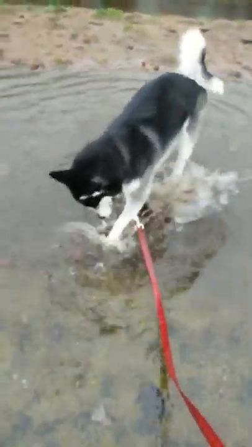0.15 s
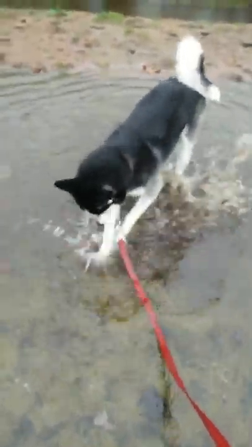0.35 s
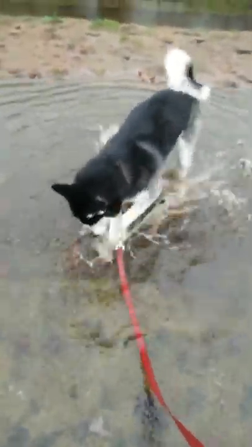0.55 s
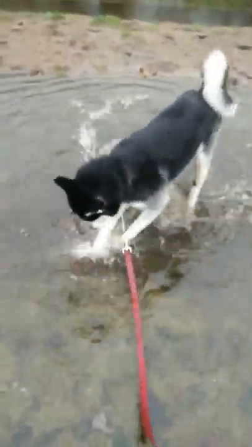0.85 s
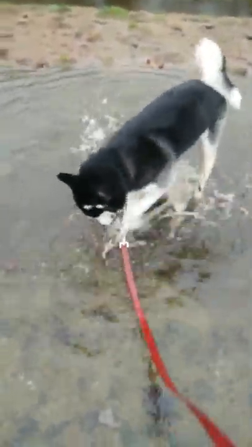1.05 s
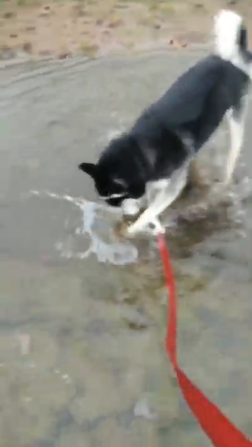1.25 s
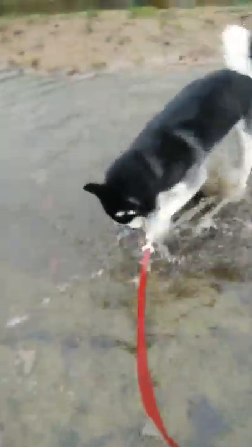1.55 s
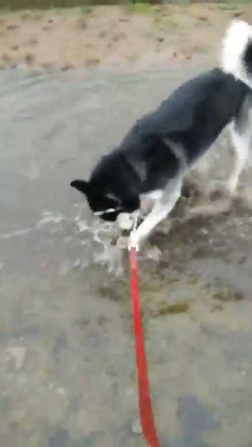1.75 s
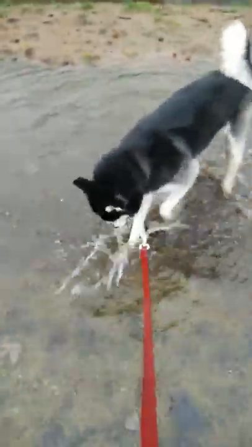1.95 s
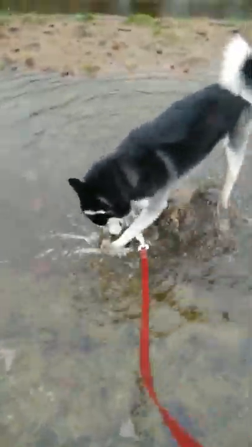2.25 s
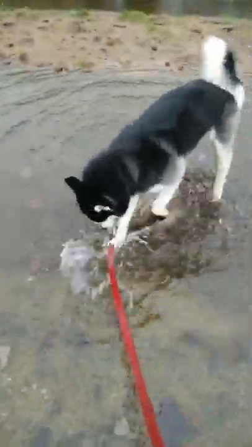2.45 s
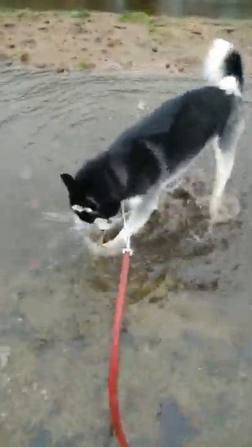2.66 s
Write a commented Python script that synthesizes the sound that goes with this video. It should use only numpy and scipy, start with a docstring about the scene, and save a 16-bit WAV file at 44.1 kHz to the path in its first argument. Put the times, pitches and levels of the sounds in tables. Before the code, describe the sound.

Rapid splashing runs throughout as a dog slaps its paws in a puddle a couple of metres away, scattering drops and bubbles. Outdoor wind grows into rumbling, popping gusts on the microphone, strongest on the left.

```python
"""A dog paws a shallow puddle outdoors, a couple of metres from two microphone ports.
From the start, each slap gives a click and a burst of drop impacts over falling spray, and trapped
air rings as bubbles; the ports resonate near 7 kHz and brighten the splashes. From about 0.8 s the
gusty wind grows, its eddies buffeting each port on its own, hardest the left. After 1.5 s they snap
most sharply, while the pawing goes on to the end over a faint steady hiss."""
import sys
import numpy as np
from scipy import signal
from scipy.io import wavfile
from scipy.ndimage import uniform_filter1d

SR = 44100
rng = np.random.default_rng(int(sys.argv[2]) if len(sys.argv) > 2 else 0)


def wav_out(sig):
    """Save sig, one row per channel (or a flat mono array), as 16-bit PCM at SR to the path in sys.argv[1]."""
    wavfile.write(sys.argv[1], SR, np.round(np.clip(np.atleast_2d(sig).T, -1, 1) * 32767).astype(np.int16))


N = 123479

# Falling spray: time_s, level_db, left_minus_right_db
FALLING_SPRAY = [(0.0, -32.5, 2), (0.09, -37, -1), (0.1, -29, -5), (0.2, -35, 1), (0.36, -30, 2),
                 (0.56, -35, 1.0), (0.62, -31, -0.5), (0.82, -34, 0), (0.85, -31, 2), (1.1, -33.5, -1.5),
                 (1.12, -32, 3), (1.27, -38.5, -2.5), (1.35, -33.5, -3.5), (1.58, -37.5, -5),
                 (1.61, -32.5, -17), (1.65, -37, 0), (1.68, -32.5, -14), (1.71, -35.5, -3.5),
                 (1.83, -35.5, -1), (1.85, -29, -1), (2.06, -39.5, -2), (2.1, -32.5, -1), (2.27, -39, -2.5),
                 (2.38, -35.5, 1), (2.6, -43, -5), (2.65, -31.5, 1), (2.66, -40.5, -4.0), (2.7, -29.5, 4),
                 (2.75, -38.5, -5), (2.8, -35, 2)]
# Paw slaps on the water: start_s, peak_db, left_minus_right_db, t60_s, rise_s
PAW_SLAPS = [(0.102, -17, 3, 0.023, 0.0043), (0.1234, -26, 4, 0.042, 0.0027),
             (0.147, -21, 2, 0.047, 0.0023), (0.2733, -19, 1, 0.016, 0.0024),
             (0.2937, -37, 0, 0.05, 0.0026), (0.3446, -17, -1, 0.041, 0.003), (0.36, -27, 7, 0.04, 0.003),
             (0.395, -16, 3, 0.074, 0.0035), (0.4464, -22.5, -6, 0.059, 0.0023),
             (0.4657, -24, 12, 0.037, 0.002), (0.607, -21, -1, 0.05, 0.0022), (0.63, -17, 2, 0.028, 0.0017),
             (0.721, -20.5, 3, 0.029, 0.0018), (0.7697, -27, 3.0, 0.067, 0.0058),
             (0.844, -25, -11, 0.05, 0.0028), (0.853, -17.5, 1, 0.05, 0.0024),
             (0.8813, -18, -4, 0.061, 0.0026), (0.9148, -20, -3, 0.049, 0.0021),
             (0.989, -25, 2, 0.043, 0.0026), (1.07, -23, -6, 0.047, 0.0032),
             (1.122, -23, -10, 0.039, 0.0027), (1.1363, -13, -3, 0.02, 0.0024),
             (1.186, -21, -6, 0.074, 0.0027), (1.3628, -22, -3, 0.039, 0.0033),
             (1.4058, -20.5, -1, 0.1, 0.0041), (1.459, -24, -1, 0.2, 0.003),
             (1.543, -21.5, -6, 0.02, 0.0048), (1.586, -22, 4, 0.044, 0.003),
             (1.596, -27, -11, 0.059, 0.0037), (1.606, -22, 15, 0.043, 0.0016),
             (1.676, -14.5, 0, 0.031, 0.0033), (1.8582, -14.5, 0, 0.016, 0.0026),
             (1.91, -21, -3, 0.085, 0.0041), (2.023, -27, 1, 0.054, 0.002), (2.0832, -38, -4, 0.045, 0.003),
             (2.104, -24, -2, 0.056, 0.0032), (2.114, -19, 1, 0.078, 0.0037),
             (2.178, -24, -3.0, 0.14, 0.0034), (2.301, -20, -1, 0.071, 0.0024),
             (2.3515, -26, -11, 0.05, 0.0032), (2.365, -20, -4, 0.13, 0.0023),
             (2.4264, -18.5, -5, 0.063, 0.0042), (2.473, -25, -4, 0.025, 0.0015),
             (2.531, -20, -6, 0.039, 0.001), (2.549, -25.5, -2, 0.09, 0.002),
             (2.629, -24.5, 7, 0.027, 0.0025), (2.642, -20, -4, 0.067, 0.003),
             (2.65, -14.5, -5, 0.015, 0.0017), (2.67, -24, -4.0, 0.037, 0.0027),
             (2.6973, -16, -9.5, 0.033, 0.0014), (2.711, -27, -6, 0.05, 0.0023),
             (2.7894, -26.5, -10, 0.042, 0.0026)]


def from_db(db):
    return 10 ** (np.asarray(db) / 20)


def unit_rms(x):
    return x / np.sqrt(np.mean(x ** 2, axis=-1, keepdims=True) + 1e-20)


def pan_gains(pan_db):
    return from_db(np.array([pan_db / 2, -pan_db / 2]))


def in_time(rows):
    """Linear interpolation of each column to one value a sample."""
    times_s, *columns = np.transpose(rows)
    return [np.interp(np.arange(N) / SR, times_s, column) for column in columns]


def level_at(spectrum, hz):
    """Interpolation of a spectrum's level over log frequency."""
    points_hz, levels_db = np.transpose(spectrum)
    return np.interp(np.log(hz), np.log(points_hz), levels_db)


def butterworth(x, edges_hz, kind, order=2):
    return signal.sosfilt(signal.butter(order, edges_hz, kind, fs=SR, output="sos"), x)


def drift(corner_hz):
    """Low-passed noise: a slow random fluctuation of unit rms."""
    step = 20
    pole = np.exp(-2 * np.pi * corner_hz * step / SR)
    slow = signal.lfilter([1], [1, -2 * pole, pole ** 2], rng.standard_normal(N // step + 1002))[1000:]
    return np.interp(np.arange(N) / step, np.arange(len(slow)), unit_rms(slow))


def resonate(x, hz, width_hz):
    """A damped two-pole resonator with unit gain at its peak."""
    radius = np.exp(-np.pi * width_hz / SR)
    gain = (1 - radius ** 2) / 2
    feedback = [1, -2 * radius * np.cos(2 * np.pi * hz / SR), radius ** 2]
    return signal.lfilter([gain, 0, -gain], feedback, x + 1e-18)


def port_resonance(x):
    """Resonance of a microphone port lifts a band of the treble."""
    return x + from_db(18) * resonate(x, hz=7390, width_hz=1050)


def to_stereo(x):
    """Interchannel delay: the left channel is slightly later; the lag shrinks from 1.0 to 1.3 s."""
    # Delay of the left channel: time_s, lag_s
    left_lag = [(0, .0003), (1.0, .0003), (1.3, .00003), (2.8, .00003)]
    lag_samples = np.round(in_time(left_lag)[0] * SR).astype(int)
    return np.array([x[np.maximum(np.arange(N) - lag_samples, 0)], x])


def hiss():
    """High-passed white noise: a faint steady hiss, independent in each channel."""
    return from_db(-52) * butterworth(rng.standard_normal((2, N)), 9500, "high")


def turbulence(spectrum, lump_db, eddy_hz, evening, span_s):
    """Passing eddies modulate eight noise bands, partly together and partly each alone."""
    edges_hz = np.geomspace(spectrum[0][0], spectrum[-1][0], num=9)
    white = rng.standard_normal((2, N))
    common_db = lump_db * drift(eddy_hz)
    pressure = np.zeros(N)
    for k, depth in enumerate(np.linspace(0.52, 1, 8)):  # higher bands swell more deeply
        low, high = edges_hz[k:k + 2]
        band = butterworth(white[k % 2], [low, high], "band")
        swell_db = depth * common_db + 4.5 * drift(eddy_hz)
        pressure += band * from_db(level_at(spectrum, np.sqrt(low * high)) + swell_db)
    pressure = unit_rms(pressure)
    # Dividing by a power of the running level partly evens out the chance swells.
    span = int(span_s * SR)
    running_power = uniform_filter1d(uniform_filter1d(pressure ** 2, span), span) + 1e-9
    return unit_rms(pressure / running_power ** (evening / 2))


def buffeting(gusts):
    """Turbulent pressure on one port: a low rumble and a higher flutter that follow the gusts."""
    # Spectra of the turbulence: frequency_hz, relative_density_db
    rumble_spectrum = [(30, -56), (45, 3.5), (70, -0.5), (110, -1), (170, -4), (260, -11.5), (400, -18)]
    flutter_spectrum = [(150, -7), (250, -2), (400, -3.5), (700, -9.5), (1200, -15), (2000, -32),
                        (3500, -36.5), (5000, -42)]
    rumble = turbulence(rumble_spectrum, lump_db=2.2, eddy_hz=36, evening=0.7, span_s=0.025)
    flutter = turbulence(flutter_spectrum, lump_db=6, eddy_hz=75, evening=0.55, span_s=0.03)
    rumble_db, flutter_db = in_time(gusts)
    return from_db(rumble_db + 2.5) * rumble + from_db(flutter_db - 3.5) * flutter


def eddy_snaps(eddies, trim_db=-4):
    """A single sharp eddy crossing a port makes one short pressure swing."""
    half = 1200
    out, t = np.zeros(N + SR), np.arange(-half, half) / SR
    for (peak_s, db, hz, width_cycles), phase in zip(eddies, rng.random(len(eddies))):
        swing = np.cos(2 * np.pi * (hz * t + phase)) * np.exp(-np.abs(hz * t / width_cycles))
        centre = int(peak_s * SR)
        out[centre - half:centre + half] += from_db(db + trim_db) * swing
    return out[:N]


def wind():
    """Turbulence is local, so each port has gusts and eddies of its own."""
    # Gusts on each port: time_s, rumble_db, flutter_db
    gusts_left = [(0.0, -24, -41), (0.08, -42, -36), (0.115, -14.5, -21), (0.15, -23.5, -40),
                  (0.2, -32, -27), (0.229, -17, -36), (0.269, -28, -61), (0.324, -25, -23.5),
                  (0.369, -37.5, -80), (0.514, -14.5, -47), (0.579, -24.5, -31), (0.634, -20, -25.5),
                  (0.725, -15, -24), (0.76, -15, -37), (0.788, -16.5, -30.5), (0.828, -11, -16.5),
                  (0.968, -17.5, -31), (1.058, -26.5, -41), (1.083, -19, -18.5), (1.117, -14.5, -39),
                  (1.157, -12.5, -18), (1.197, -17.5, -19), (1.232, -30, -52), (1.262, -18.5, -29),
                  (1.287, -8.5, -18), (1.382, -26.5, -38), (1.417, -19, -63), (1.447, -23.5, -26.5),
                  (1.53, -10.5, -17.5), (1.58, -14.5, -27.5), (1.631, -15, -11.5), (1.666, -19, -19.5),
                  (1.721, -18, -8), (1.761, -25, -31), (1.816, -21.5, -25), (1.851, -21, -38),
                  (1.951, -11.5, -11), (2.0, -27.5, -34), (2.03, -20, -26), (2.07, -33, -44),
                  (2.135, -11.5, -24), (2.21, -31, -35), (2.24, -10, -29), (2.29, -11, -1),
                  (2.345, -14, -21), (2.524, -9.5, -10), (2.619, -16, -21), (2.68, -15.5, -21),
                  (2.735, -18, -24), (2.799, -19, -12.5)]
    gusts_right = [(0.0, -30, -44), (0.165, -36, -33.5), (0.2, -33, -38), (0.274, -43, -58),
                   (0.314, -37.5, -54), (0.424, -30.5, -54), (0.469, -43, -45), (0.539, -35.5, -34),
                   (0.773, -43, -37), (0.838, -20, -33), (0.893, -30, -37), (0.973, -45, -37),
                   (1.008, -37, -24), (1.117, -36, -37), (1.162, -12, -14), (1.217, -35, -41),
                   (1.247, -25, -60), (1.332, -56, -67), (1.432, -45, -29.5), (1.507, -58, -30.5),
                   (1.541, -20, -24), (1.626, -32.5, -29.5), (1.771, -13, -31), (1.941, -25.5, -22),
                   (2.015, -18, -27.5), (2.055, -25.5, -26), (2.125, -17, -18.5), (2.18, -34, -16.5),
                   (2.235, -19.5, -10.5), (2.365, -34, -26.5), (2.415, -23, -20), (2.479, -39, -28),
                   (2.599, -21, -19.5), (2.704, -34, -34), (2.744, -22.5, -21.5), (2.799, -32, -18.5)]
    # Single eddies on each port: peak_s, peak_db, pitch_hz, width_cycles
    eddies_left = [(0.116, -4, 310, 0.66), (0.2248, -12.5, 700, 0.38), (0.228, -8.5, 353, 0.97),
                   (0.328, -14, 450, 0.21), (0.428, -11, 400, 0.17), (0.7255, 2, 109, 0.85),
                   (0.947, 0.5, 134, 0.88), (0.821, -0.5, 507, 0.22), (1.0813, -1, 486, 0.2),
                   (1.1543, 0.5, 660, 0.54), (1.1659, -3, 646, 0.44), (1.2693, 0, 360, 0.25),
                   (1.4203, 1.5, 314, 0.35), (1.5658, 2, 460, 0.4), (1.5865, 3.5, 468, 0.35),
                   (1.6377, 10, 440, 0.35), (1.6528, 6, 910, 0.26), (1.7005, 2, 476, 0.4),
                   (1.7126, 4, 630, 0.4), (1.7127, -3, 2810, 0.32), (1.7215, 5, 315, 0.46),
                   (1.9246, 5, 617, 0.38), (1.9513, 1, 384, 0.21), (2.0268, -5, 400, 0.41),
                   (2.1568, -9, 490.0, 0.57), (2.2437, 9, 437, 0.14), (2.28, -6, 1100, 0.24),
                   (2.2924, 6, 483, 0.11), (2.317, 3, 393, 0.43), (2.3979, 6, 760, 0.18),
                   (2.4429, 14, 715, 0.11), (2.509, -8, 1800, 0.36), (2.519, 2, 1510, 0.24),
                   (2.524, 1, 1800, 0.3), (2.5282, 9.5, 610, 0.25), (2.6555, -0.5, 537, 0.4),
                   (2.735, -2, 54.7, 1.2), (2.7437, 4, 540.0, 0.19), (2.7932, -9, 493, 0.23)]
    eddies_right = [(1.0998, -11, 457, 0.45), (1.1616, 1, 455, 0.32), (1.5628, -2.5, 500.0, 0.18),
                    (1.8579, -3, 443, 0.42), (2.01, 0, 360, 0.38), (2.0828, 1.5, 437, 0.35),
                    (2.1185, 2.5, 557, 0.18), (2.1896, 3, 1020, 0.23), (2.2245, 6, 970, 0.15),
                    (2.2396, -1, 516, 0.35), (2.3268, -6, 520.0, 0.13), (2.5083, -11, 710.0, 0.5),
                    (2.568, -9, 420, 1), (2.591, -3, 610, 0.55), (2.5963, -3, 670, 0.3),
                    (2.6127, 2.5, 653, 0.17), (2.7372, 2.5, 770, 0.3), (2.7839, 4.5, 710, 0.29)]
    return np.array([buffeting(gusts_left) + eddy_snaps(eddies_left),
                     buffeting(gusts_right) + eddy_snaps(eddies_right)])


def small_bubbles(per_s=250, q=18, against_spray_db=-17):
    """Little air bubbles, excited at random, ring as damped resonators under the spray."""
    sizes = from_db(3 * np.minimum(rng.exponential(1, N), 3))
    kicks = sizes * (rng.random(N) < per_s / SR)
    pitch_index = rng.integers(0, 16, N)
    rings = sum(resonate(kicks * (pitch_index == k), hz, hz / q) / hz
                for k, hz in enumerate(np.geomspace(800, 3600, num=16)))
    return from_db(in_time(FALLING_SPRAY)[0] + against_spray_db) * unit_rms(rings)


def plops(pitch_rise=0.17):
    """Trapped air pulsates as a damped oscillator, rising in pitch as it dies away."""
    # Distinct bubbles: start_s, peak_db, pitch_hz, t60_cycles
    bubbles = [(0.012, -31.5, 980, 28), (0.046, -19, 1470, 25), (.068, -21, 1270, 55),
               (.106, -12, 1890, 13), (0.175, -23, 1370, 57), (0.23, -23, 1370, 17), (.289, -24, 1310, 24),
               (0.317, -25, 1460, 30), (0.341, -23, 1400, 37), (0.361, -20.5, 1250, 25),
               (0.415, -11.5, 1400, 12), (.426, -20.5, 655, 18), (0.555, -23.5, 950, 31),
               (.628, -21, 3400, 27), (0.629, -11, 1340, 23), (0.631, -32, 1710, 18),
               (.695, -9.5, 800, 9.4), (.696, -6, 1540, 21), (0.898, -7.5, 860, 9.3), (1.46, -4, 915, 5.2),
               (0.855, -28, 1460, 13), (1.7645, -26, 2090, 22), (1.766, -25, 2880, 37),
               (2.395, -12.5, 1380, 15), (2.552, -14, 1310, 10), (2.553, -18, 2130, 23),
               (2.642, -17.5, 3200, 22), (2.643, -21.5, 2170, 30)]
    out, t = np.zeros(N), np.arange(SR // 20) / SR
    for start_s, db, hz, t60_cycles in bubbles:
        start, cycles = int(start_s * SR), hz * t
        tone = np.sin(2 * np.pi * cycles * (1 + pitch_rise * cycles / t60_cycles / 2))
        envelope = np.minimum(cycles, 1) * from_db(db - 60 * cycles / t60_cycles)
        out[start:start + len(t)] += envelope * tone
    return out


def drops(per_s=5200, spread_db=2.5, clump_db=1.5, mist_share=0.29, q=3.8):
    """Shot noise: clumped drop impacts ring briefly, over a mist of drops too fine to tell apart."""
    # Spectrum of the water ahead of the ports: frequency_hz, relative_density_db
    water_spectrum = [(500, -28), (900, -2), (1500, 0.5), (2200, -7), (3300, -2), (4800, -6.5),
                      (7000, -7.5), (10000, -12.5), (13000, -12), (16000, -13)]
    sizes = from_db(spread_db * np.minimum(rng.exponential(1, N), 5)) * rng.choice([-1, 1], N)
    impacts = unit_rms(sizes * (rng.random(N) < per_s * from_db(clump_db * drift(30)) / SR))
    pitch_index = rng.integers(0, 24, N)
    hits = np.sqrt(1 - mist_share) * impacts + np.sqrt(mist_share) * rng.standard_normal(N)
    out = np.zeros(N)
    for k, hz in enumerate(np.geomspace(500, 16000, num=24)):
        ring = resonate(hits * (pitch_index == k), hz, hz / q)
        out += from_db(level_at(water_spectrum, hz)) * resonate(ring, hz, hz / q)
    return out


def slap_clicks(trim_db=-0.5):
    """The first contact of each slap is an impulse: one band-limited click that both ports share."""
    clicks = np.zeros((2, N))
    signs = rng.choice([-1, 1], len(PAW_SLAPS))
    for (start_s, db, pan_db, _, rise_s), sign in zip(PAW_SLAPS, signs):
        clicks[:, int((start_s + rise_s / 2) * SR)] += sign * from_db(db + trim_db) * pan_gains(pan_db)
    clicks[0] = to_stereo(clicks[0])[0]
    return port_resonance(butterworth(clicks + 1e-18, [3070, 10900], "band"))


def splashes(spray_trim_db=-1, slap_trim_db=-6, common_share=0.26):
    """Incoherent sources add in power: falling spray plus a decaying burst of drops at each slap."""
    spray_db, spray_pan_db = in_time(FALLING_SPRAY)
    power = (from_db(spray_db + spray_trim_db) * pan_gains(spray_pan_db)) ** 2
    t = np.arange(SR // 4) / SR
    for start_s, db, pan_db, t60_s, rise_s in PAW_SLAPS:
        start = int(start_s * SR)
        decay_db = 60 * np.maximum(t - rise_s, 0) / t60_s
        burst = np.minimum(t / rise_s, 1) * from_db(db + slap_trim_db - decay_db)
        power[:, start:start + len(t)] += np.outer(pan_gains(pan_db), burst)[:, :N - start] ** 2
    common = np.sqrt(common_share) * to_stereo(drops())
    separate = np.sqrt(1 - common_share) * np.array([drops(), drops()])
    return np.sqrt(power) * unit_rms(port_resonance(common + separate))


def scene():
    """Superposition of wind, hiss, splashes and bubbles at the two ports."""
    return wind() + hiss() + splashes() + slap_clicks() + to_stereo(plops() + small_bubbles())


def record(dry):
    """Band limiting and saturation: the lowest bass is cut, peaks are rounded, the top is cut."""
    ceiling, low_cut_hz, stopband_hz = 0.93, 54, 16250
    drive = butterworth(dry, low_cut_hz, "high", order=4) / ceiling
    rounded = ceiling * drive / (1 + drive ** 6) ** (1 / 6)
    return signal.sosfilt(signal.cheby2(24, 80, stopband_hz, fs=SR, output="sos"), rounded)


dry = scene()
out = record(dry)
wav_out(out)
```